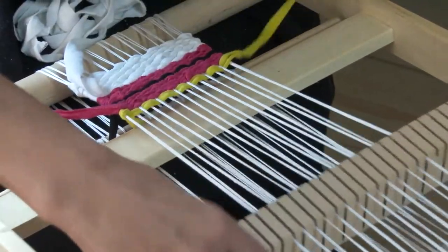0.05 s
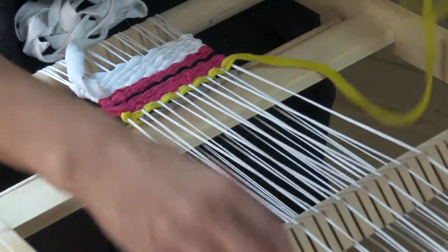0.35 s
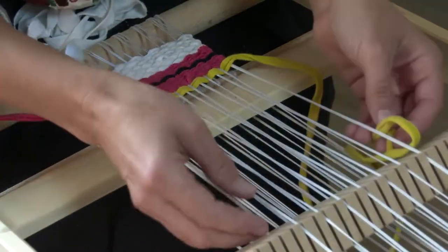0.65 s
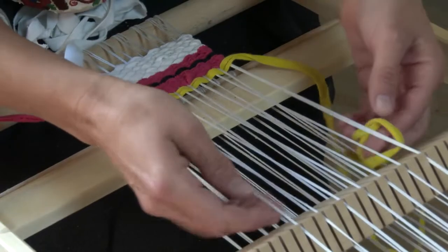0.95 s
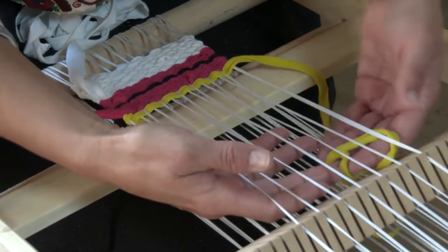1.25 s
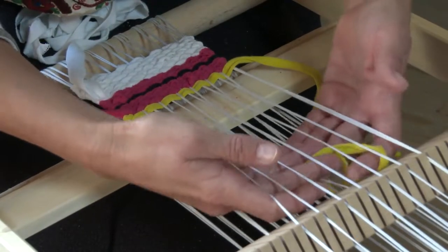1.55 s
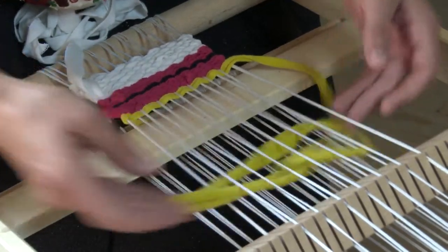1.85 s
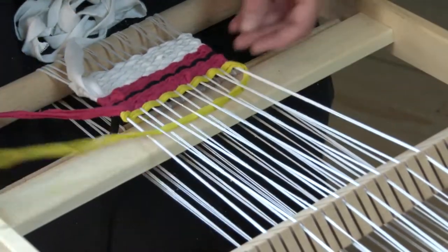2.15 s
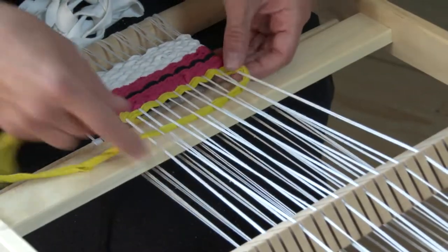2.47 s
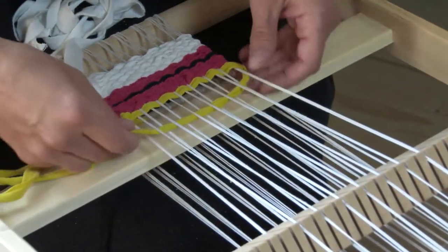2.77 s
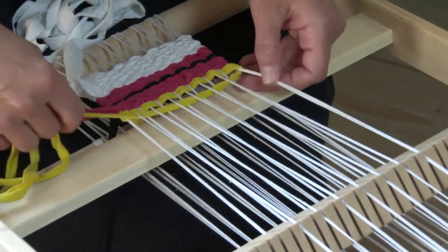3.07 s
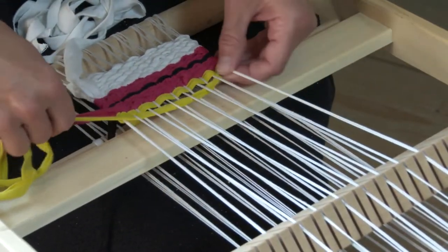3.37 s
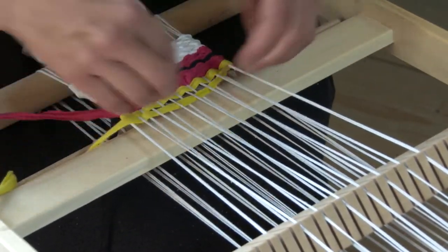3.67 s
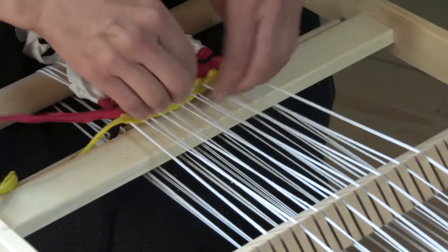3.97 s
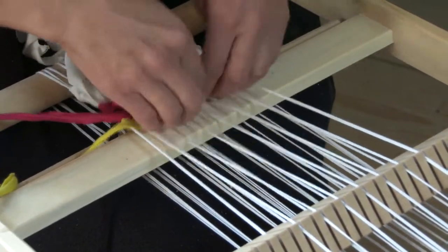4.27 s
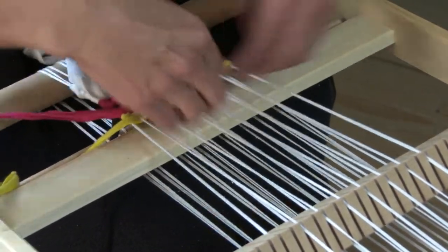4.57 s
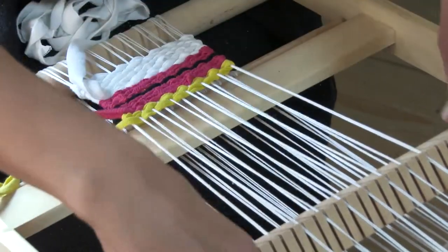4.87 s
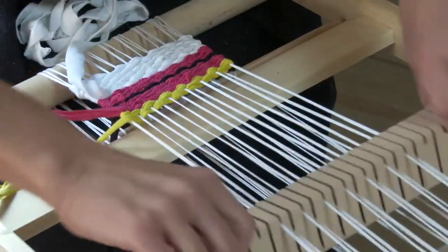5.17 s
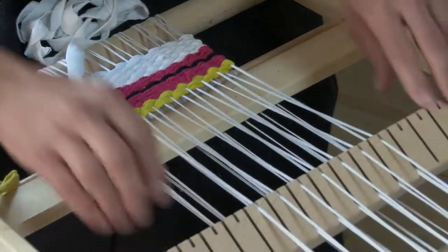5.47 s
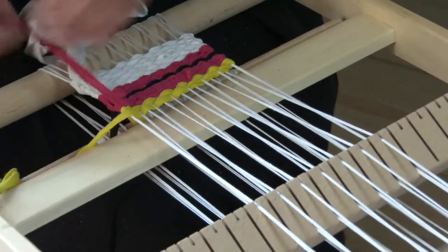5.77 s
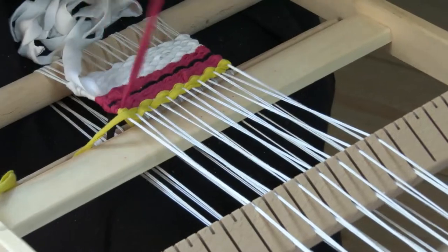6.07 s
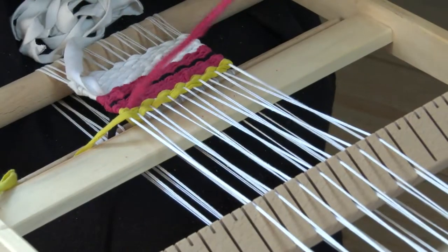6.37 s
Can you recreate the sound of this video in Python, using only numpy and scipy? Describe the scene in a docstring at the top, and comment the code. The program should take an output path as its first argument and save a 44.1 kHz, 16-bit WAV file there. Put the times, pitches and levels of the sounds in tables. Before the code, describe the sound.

Close, quiet handling of a wooden loom indoors, over a low hum and faint hiss. After a light knock and a low thud, yarn is drawn through the threads with a soft swish, small ticks and a short rasp. A dull scuff and little fingertip scratches follow. Then a short rub leads to the loudest sound, a bright wood-on-wood clack with a slight room echo, and soft brushing continues.

```python
"""A heddle knocks against the wooden frame of a small loom, ringing its modes, as someone weaves.
Pushed along the taut warp, the heddle bows the threads by friction. Thick yarn hisses through them,
rasps as it is tugged snug, and is pressed down by fingers that flick the threads and bump the loom.
The quiet room echoes the knocks and flicks; a low hum, a rumble and a faint hiss lie underneath."""
import sys
import numpy as np
from scipy import signal
from scipy.fft import rfft, irfft, next_fast_len
from scipy.io import wavfile
from scipy.ndimage import map_coordinates

SR = 44100
rng = np.random.default_rng(int(sys.argv[2]) if len(sys.argv) > 2 else 0)


def persist_wave(psi):
    """Save psi, clipped to +-1, as 16-bit WAV."""
    counts = np.round(np.clip(psi, -1, 1) * 32767).astype(np.int16)
    wavfile.write(sys.argv[1], SR, np.atleast_2d(counts).T)


N = 283102

# resonances of the rubbed warp threads: (frequency [Hz], bandwidth [Hz], gain [dB])
WARP_MODES = [(278, 20, 19), (455, 22, 11), (570, 30, 5), (810, 50, 5), (960, 50, 4), (1140, 70, 8),
              (1680, 120, 1), (2930, 190, 7), (6900, 300, -2)]
# spectrum of fibres hissing over threads: (frequency [Hz], level [dB])
FIBRE_SPECTRUM = [(600, -37), (1200, -3), (2200, -3.5), (4500, -0.5), (6500, -6), (10000, -8), (15800, -16)]
# spectrum of the rubbed body of the cloth: (frequency [Hz], level [dB])
CLOTH_SPECTRUM = [(70, -37), (130, -6), (450, -0.5), (700, -7), (1100, -4.5), (1500, -16), (2300, -15),
                  (4000, -37), (8000, -67)]


def amp(db):
    """Amplitude ratio of a level in decibels."""
    return 10 ** (np.asarray(db) / 20)


def unit(x):
    """x scaled to an rms of 1."""
    return x / np.sqrt(np.mean(x ** 2) + 1e-20)


def along(points, hz):
    """Interpolation of (frequency, value) points on a logarithmic frequency axis."""
    freqs, values = np.transpose(points)
    return np.interp(np.log(hz + 1), np.log(freqs), values)


def wobble(rate):
    """Random modulation: a smooth curve through rate knots a second."""
    return map_coordinates(rng.standard_normal(int(N * rate / SR) + 4), [np.arange(N) * rate / SR])


def filtered(x, response):
    """Linear filtering: the spectrum of x times a frequency response."""
    size = next_fast_len(len(x) + SR // 2)
    return irfft(rfft(x, size) * response(np.fft.rfftfreq(size, 1 / SR)), size)[:len(x)]


def coloured(x, spectrum):
    """Spectral shaping of x, at an rms of 1."""
    return unit(filtered(x, lambda hz: amp(along(spectrum, hz))))


def resonant(x, modes, ring_db):
    """Forced vibration: x plus the response of the damped modes that it drives."""
    def ringing(f):
        return sum(amp(db) * 1j * f * width / (hz * hz - f * f + 1j * f * width)
                   for hz, width, db in modes)
    return filtered(x, lambda f: 1 + amp(ring_db) * ringing(f))


def friction(rate, share):
    """Stick-slip noise: smooth rubbing, with a share of the power in rate fibre slips a second."""
    slips = rng.standard_normal(N) * (rng.random(N) < rate / SR)
    return np.sqrt(1 - share) * rng.standard_normal(N) + np.sqrt(share) * unit(slips)


def stroke(start, length, attack_s, release_s, change_db=0):
    """Envelope of a steady movement: a smooth rise, a drift by change_db, an exponential decay."""
    t = np.arange(N) / SR - start
    rise = np.sin(np.pi / 2 * np.clip(t / attack_s, 0, 1))
    drift = amp(change_db * (np.clip(t / length, 0, 1) - .5))
    return rise * drift * np.exp(-np.maximum(t - length, 0) / release_s)


def swell(start, length, growth, release_s):
    """Envelope of a force that builds as a power of time and then lets go."""
    t = np.arange(N) / SR - start
    return np.clip(t / length, 0, 1) ** growth * np.exp(-np.maximum(t - length, 0) / release_s)


def together(gains):
    """Incoherent summation: overlapping rubs add in power."""
    return np.sqrt(sum(gain ** 2 for gain in gains))


def add(track, start, sound):
    """Superposition of a sound on the track from start seconds on."""
    part = track[round(start * SR):][:len(sound)]
    part += sound[:len(part)]


def heddle_knocks(clatter_t60=0.076, crack_t60=0.027, thump_t60=0.07, attack_s=0.00065):
    """Impact excitation: wood on wood rings the frame's modes; a softer contact passes less treble."""
    # contacts, three in quick succession for the hardest blow:
    # (time [s], level [dB], brightness [Hz], relative thump level [dB], thump frequency [Hz])
    contacts = [(0.2326, -37, 1420, -16, 129), (0.2344, -29.5, 610, -9, 294), (0.2393, -34, 515, -11, 243),
                (.256, -43.5, 400, -1, 487), (0.887, -54, 705, -13, 230), (1.2333, -49, 990, 7, 444),
                (1.2391, -47, 800, 1, 236), (1.354, -58, 600, -1, 427), (1.437, -58, 800, -12, 230),
                (2.252, -47, 2500, -33, 230), (2.5711, -51.5, 900, -3, 428), (3.837, -54, 2500, -15.5, 230),
                (4.082, -54.5, 1400, -6, 232), (4.5081, -49, 1090, 2.5, 225), (5.3252, -24, 9000, -13, 121),
                (5.3271, -14.5, 4400, -27, 226), (5.3343, -24, 1700, -7, 226)]
    # modes of frame and heddle: (frequency [Hz], bandwidth [Hz], level [dB])
    frame_modes = [(226, 32, 0), (598, 25, -6), (937, 90, -4), (1120, 27, -7), (1250, 15, -5),
                   (1360, 15, -3), (1480, 28, 0), (1630, 32, -2), (1840, 27, -4), (2080, 15, -8),
                   (2220, 29, -3), (2450, 61, -4), (2730, 17, -7), (2890, 34, -8), (3160, 42, -13),
                   (3680, 97, -12), (4020, 160, -13), (4370, 47, -22), (4670, 120, -23), (4890, 31, -21),
                   (5170, 89, -21), (5320, 22, -23), (5730, 54, -24), (6420, 120, -28), (6990, 43, -29),
                   (8090, 37, -35), (8400, 140, -37), (9210, 23, -38), (9540, 58, -38), (9750, 20, -40)]
    # dense overtones of the wood: (frequency [Hz], level [dB])
    wood_spectrum = [(120, -7), (350, -17), (500, -3.5), (800, -1.5), (1400, -2), (2000, -1.5),
                     (2700, -5.5), (3100, -11), (3900, -6), (4500, -16.5), (6600, -16), (7500, -26),
                     (15000, -37)]
    in_phase_hz = 400  # modes below this start in phase with the blow
    out, t = np.zeros(N), np.arange(SR // 2) / SR
    for start, db, bright_hz, thump_db, thump_hz in contacts:
        ring = np.zeros(len(t))
        for hz, width, mode_db in frame_modes:
            phase = rng.random() * (hz > in_phase_hz)
            decay = np.exp(-np.pi * width * t)
            ring += amp(mode_db) * width * decay * np.sin(2 * np.pi * (hz * t + phase))
        ring *= 0.354 / np.std(ring[:SR // 100])  # level set by the first 10 ms
        clatter = amp(-5 - 60 * t / clatter_t60) * coloured(rng.standard_normal(len(t)), wood_spectrum)
        thump = amp(thump_db - 60 * t / thump_t60) * np.sin(2 * np.pi * thump_hz * t)
        body = (ring + clatter + thump) * (1 - np.exp(-t / attack_s))
        crack = amp(-18 - 60 * t / crack_t60) * rng.standard_normal(len(t))
        lowpass = signal.butter(1, min(2.28 * bright_hz, SR / 3), fs=SR)
        softened = signal.lfilter(*lowpass, body)
        add(out, start, amp(db) * signal.lfilter(*lowpass, softened + crack))
    return out


def loom_bumps(attack_s=0.0096):
    """Damped free vibration: soft pushes of the hands sway the whole loom in its lowest modes."""
    # pushes: (time [s], level [dB], frequency [Hz], t60 [s])
    pushes = [(.275, -50.5, 72.5, 0.86), (0.623, -50, 82.7, 0.41), (0.949, -25.5, 96, 0.04),
              (0.973, -28, 88, 0.089), (1.026, -40, 82, 0.17), (1.3, -52.5, 91, 0.41),
              (1.589, -49.5, 132, 0.23), (2.022, -52.5, 155, 0.17), (4.371, -46.5, 78.4, .14),
              (4.575, -47.5, 74.3, 0.52), (5.381, -38, 68.5, 0.38)]
    out, t = np.zeros(N), np.arange(SR // 2) / SR
    for start, db, hz, t60 in pushes:
        envelope = amp(db - 60 * t / t60) * (1 - np.exp(-t / attack_s))
        add(out, start, envelope * np.sin(2 * np.pi * hz * t))
    return out


def heddle_slides(flutter_db=1):
    """Frictional excitation: the heddle's slots bow the warp, growing louder on the way to the frame."""
    # slides along the warp: (time [s], duration [s], level [dB])
    slides = [(-.1, 0.323, -53.5), (5.008, 0.35, -52)]
    # spectrum of the slots rubbing the threads: (frequency [Hz], level [dB])
    slot_spectrum = [(100, 0), (250, -12), (380, -9), (600, -4), (1100, -6.5), (1400, -3), (2300, -7.5),
                     (4500, -5), (7000, -10), (11000, -15), (15800, -21)]
    envelope = together(amp(db) * stroke(start, length, attack_s=0.12, release_s=0.022, change_db=2.5)
                        for start, length, db in slides)
    singing = resonant(friction(rate=2000, share=.3), WARP_MODES, ring_db=1)
    return coloured(singing, slot_spectrum) * envelope * amp(flutter_db * wobble(30))


def thread_flicks(gain_db=-2, t60=0.022):
    """Plucking: a thread slips off a finger with a short, heavily damped snap."""
    # flicks: (time [s], relative level [dB], centre frequency [Hz])
    flicks = [(0.952, -52.5, 3740), (0.978, -55, 4050), (1.208, -59, 2000), (1.2316, -51, 4500),
              (1.4355, -50, 2900), (1.498, -58.5, 10000), (1.5644, -59.5, 9900), (2.251, -47, 3220),
              (2.398, -52.5, 5000), (2.415, -56, 9900), (2.5472, -41.5, 3000), (2.547, -60, 12100),
              (3.376, -54, 2300), (3.507, -58, 11000), (3.837, -51.5, 2950), (3.8808, -46, 3120),
              (4.3878, -53.5, 3000), (4.5087, -43.5, 3530), (5.679, -55, 3770)]
    # resonances of a flicked stretch of warp: (frequency [Hz], bandwidth [Hz], gain [dB])
    thread_modes = [(3010, 210, -3), (3600, 140, 4), (6860, 280, -6), (9200, 600, 0)]
    out, t = np.zeros(N), np.arange(SR // 10) / SR
    for start, db, hz in flicks:
        slip = signal.lfilter(*signal.iirpeak(hz, Q=1.4, fs=SR), rng.standard_normal(len(t)))
        snap = unit(resonant(slip, thread_modes, ring_db=3))
        add(out, start, amp(db + gain_db - 60 * t / t60) * snap)
    return out


def wood_scuffs(attack_s=0.042):
    """Sliding friction: hand and yarn drag dully across the wood, catching at once and trailing off."""
    # drags: (time [s], level [dB])
    drags = [(2.834, -47), (4.219, -57.5)]
    # spectrum of the rubbed wood: (frequency [Hz], level [dB])
    drag_spectrum = [(59, -53), (100, -12), (215, 0.5), (259, -7.5), (346, 1), (502, -2), (895, -3),
                     (972, -1.5), (1700, -8.5), (2090, -7), (14000, -41.5)]
    envelope = together(amp(db) * stroke(start, attack_s, attack_s, release_s=0.079)
                        for start, db in drags)
    return envelope * coloured(friction(rate=810, share=0.43), drag_spectrum)


def yarn_tugs(gain_db=-3, flutter_db=2):
    """Stick-slip friction: yarn rasps and zips round the edge thread, driving its longitudinal modes."""
    # tugs: (time [s], duration [s], relative rasp level [dB], relative zip level [dB])
    tugs = [(2.607, 0.087, -60, -62), (2.68, .015, -50, -58.5), (2.704, .015, -57, -77),
            (3.214, 0.13, -67, -68.5), (3.37, 0.132, -73, -70), (3.503, 0.036, -60, -64.5)]
    # spectrum of the rasping yarn: (frequency [Hz], level [dB])
    rasp_spectrum = [(200, -5), (400, -7.5), (900, -0.5), (1500, -5.5), (3000, -8), (5000, -3.5),
                     (8000, -19), (12000, -30), (15800, -15.5)]
    # treble zip of single fibres skidding: (frequency [Hz], level [dB])
    zip_spectrum = [(2500, -25), (5500, -2.5), (8500, -1), (15800, -11)]
    # modes of the taut edge thread: (frequency [Hz], bandwidth [Hz], gain [dB])
    edge_modes = [(2020, 50, -3), (2310, 70, -2), (3520, 60, 2), (4100, 100, -9), (5740, 80, -7),
                  (6860, 190, -11), (8420, 200, -5), (9780, 250, -11), (11120, 130, -5), (13800, 90, -11)]
    pulls = [(swell(start, length, growth=1, release_s=0.022), rasp_db, zip_db)
             for start, length, rasp_db, zip_db in tugs]
    rasp_gain = together(amp(db) * pull for pull, db, _ in pulls)
    zip_gain = together(amp(db) * pull for pull, _, db in pulls)
    rasp = rasp_gain * coloured(friction(rate=1200, share=.4), rasp_spectrum)
    skid = zip_gain * coloured(friction(rate=1400, share=0.34), zip_spectrum)
    return resonant((rasp + skid) * amp(gain_db + flutter_db * wobble(90)), edge_modes, ring_db=13)


def weft_presses(body_db=3, flutter_db=1.5, firm_db=-57):
    """Friction under rising load: fingertips scratch down the warp; a firm press squashes the yarn."""
    # presses on the weft: (time [s], duration [s], level [dB])
    presses = [(3.761, 0.047, -61), (3.798, 0.046, -57.5), (3.901, 0.026, -60.5), (4.004, 0.049, -62.5),
               (4.047, 0.045, -59.5), (4.135, 0.029, -65), (4.225, 0.097, -58.5), (4.451, 0.064, -59),
               (6.134, 0.028, -63.5)]
    force = together(amp(db) * swell(start, length, growth=1.28, release_s=0.013)
                     for start, length, db in presses)
    firmness = np.minimum(force / amp(firm_db), 1)
    scratch = coloured(resonant(friction(rate=940, share=0.25), WARP_MODES, ring_db=3), FIBRE_SPECTRUM)
    squash = amp(body_db) * firmness * coloured(friction(rate=790, share=0.18), CLOTH_SPECTRUM)
    return force * (scratch + squash) * amp(flutter_db * wobble(60))


def warp_brushing(gain_db=-1, flutter_db=1, drift_db=1.1, firm_db=-59):
    """Friction noise: fibres hiss above the cloth's duller rub; firm contact makes the warp resonate."""
    # light sweeps of yarn or a hand over the warp:
    # (time [s], duration [s], relative hiss level [dB], relative cloth level [dB])
    sweeps = [(0.234, 0.35, -68.5, -73.5), (.9, 0.078, -71, -68), (0.991, .15, -64.5, -67),
              (1.317, 0.35, -73, -68.5), (1.722, .14, -60, -58), (1.875, 0.31, -66, -64.5),
              (2.265, 0.3, -65, -67.5), (4.525, 0.23, -69, -76), (4.75, .23, -60.5, -67.5),
              (5.412, 0.082, -56.5, -62.5), (5.53, 0.31, -74.5, -70), (5.741, 0.34, -67.5, -72.5),
              (6.107, 0.14, -66, -76.5)]
    shapes = [(stroke(start, length, attack_s=0.068, release_s=0.048, change_db=-0.5), hiss_db, cloth_db)
              for start, length, hiss_db, cloth_db in sweeps]
    hiss_gain = together(amp(db) * shape for shape, db, _ in shapes)
    cloth_gain = together(amp(db) * shape for shape, _, db in shapes)
    light = coloured(friction(rate=1100, share=0.3), FIBRE_SPECTRUM)
    firm = coloured(resonant(friction(rate=1100, share=.25), WARP_MODES, ring_db=0), FIBRE_SPECTRUM)
    firmness = np.minimum(hiss_gain / amp(firm_db), 1)
    hiss = hiss_gain * (firmness * firm + np.sqrt(1 - firmness ** 2) * light)
    cloth = cloth_gain * coloured(friction(rate=830, share=0.19), CLOTH_SPECTRUM)
    return (hiss + cloth) * amp(gain_db + flutter_db * wobble(41) + drift_db * wobble(7.6))


def reverberation(x, build_s=0.0029):
    """Diffuse reflection: the walls return a dull tail that decays exponentially in each band."""
    # reverberation times of the room: (frequency [Hz], t60 [s])
    decay_times = [(100, 0.13), (500, 0.37), (2000, 0.33), (4000, 0.26), (9000, 0.38)]
    # colour of the tail: (frequency [Hz], gain [dB])
    tail_spectrum = [(100, 3.5), (2000, 1.0), (4000, -5.5), (9000, -14.0)]
    hz, t, bands = signal.stft(rng.standard_normal(SR // 2), SR, nperseg=256)
    decay = amp(-60 * t / along(decay_times, hz)[:, None])
    tail = signal.istft(bands * decay, SR, nperseg=256)[1]
    tail *= 1 - np.exp(-np.arange(len(tail)) / SR / build_s)
    tail = filtered(tail, lambda f: amp(along(tail_spectrum, f)))
    return signal.fftconvolve(x, tail / np.linalg.norm(tail))[:N]


def background(waver_db=1, rumble_db=-69, air_db=-68.5):
    """Ambient noise: a low hum, wavering in phase and level, over the room's rumble and faint hiss."""
    # partials of the hum: (frequency [Hz], level [dB])
    partials = [(70.0, -60), (349.9, -81.5), (694.4, -83)]
    # spectrum of the rumble: (frequency [Hz], level [dB])
    rumble_spectrum = [(30, -28), (52, -10), (68, -4), (85, -12), (130, -29), (400, -43), (2000, -120)]
    # spectrum of the room's hiss: (frequency [Hz], level [dB])
    air_spectrum = [(65, -30), (110, 0.5), (163, -5.5), (345, -6), (443, -9.5), (699, -8.5), (2150, -15.5),
                    (4540, -16.5), (14800, -24), (15800, -25)]
    base_hz = partials[0][0]
    cycles = base_hz * np.arange(N) / SR + .025 * wobble(3)
    hum = sum(amp(db + waver_db * wobble(8.7)) * np.sin(2 * np.pi * cycles * hz / base_hz)
              for hz, db in partials)
    rumble = amp(rumble_db) * coloured(rng.standard_normal(N), rumble_spectrum)
    air = amp(air_db) * coloured(rng.standard_normal(N), air_spectrum)
    return hum + rumble + air


def scene(wet_db=-13):
    """Superposition: the loom close by, the reverberation of its knocks and flicks, the background."""
    blows = heddle_knocks() + thread_flicks()
    echo = amp(wet_db) * reverberation(blows)
    rubbing = warp_brushing() + weft_presses() + heddle_slides() + yarn_tugs() + wood_scuffs()
    return blows + echo + loom_bumps() + rubbing + background()


def record(dry, low_hz=40, top_hz=15850):
    """Band limiting: the deepest bass rolls off and nothing passes above top_hz."""
    thin = signal.lfilter(*signal.butter(2, low_hz, "high", fs=SR), dry)
    return filtered(thin, lambda hz: hz < top_hz)


dry = scene()
out = record(dry)
persist_wave(out)
```